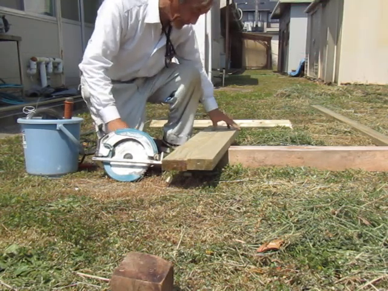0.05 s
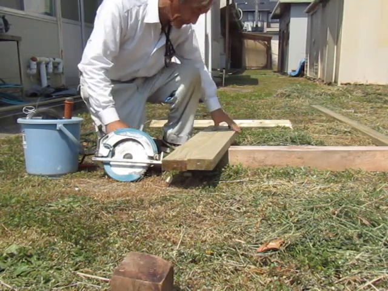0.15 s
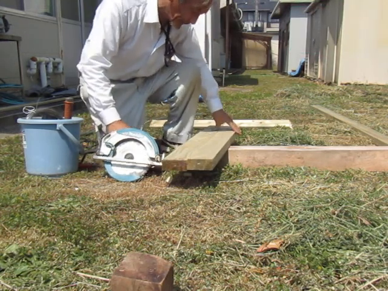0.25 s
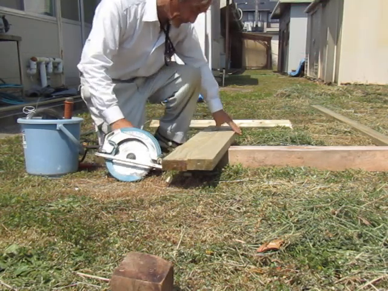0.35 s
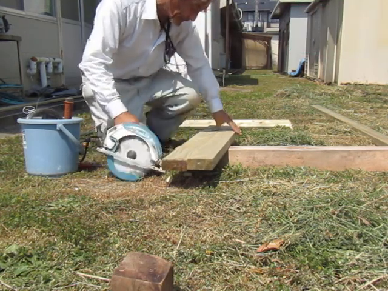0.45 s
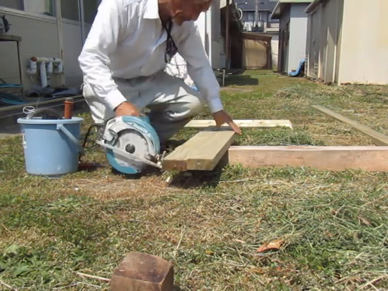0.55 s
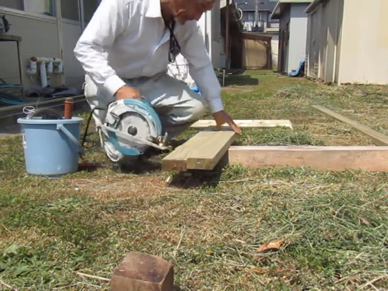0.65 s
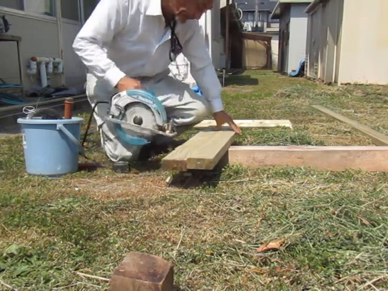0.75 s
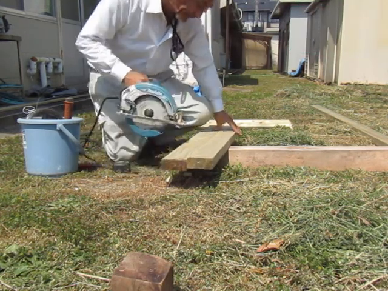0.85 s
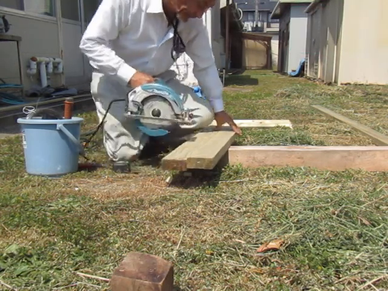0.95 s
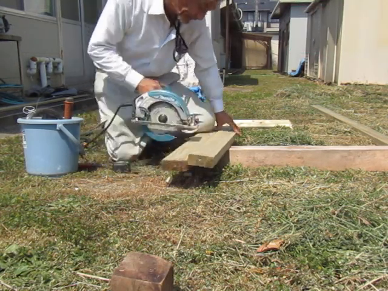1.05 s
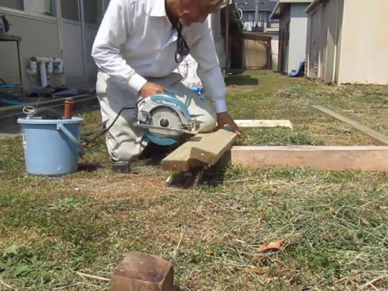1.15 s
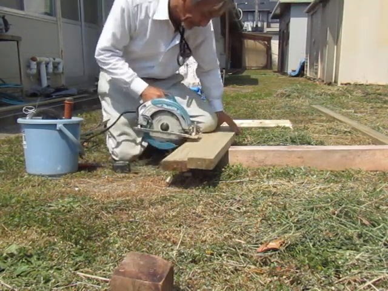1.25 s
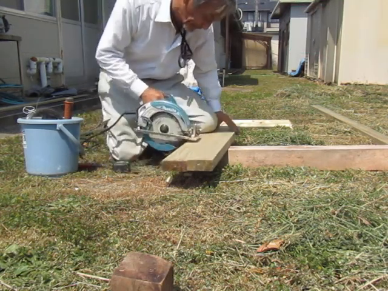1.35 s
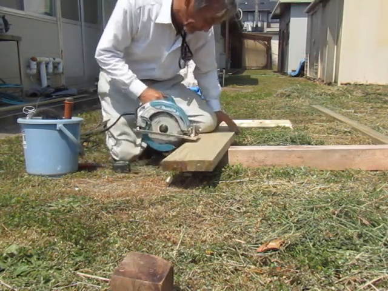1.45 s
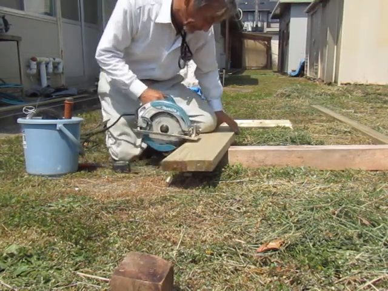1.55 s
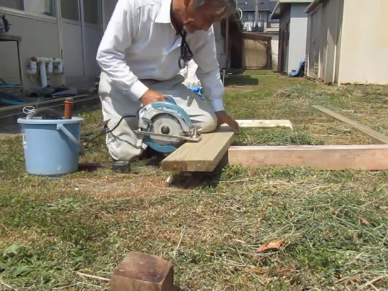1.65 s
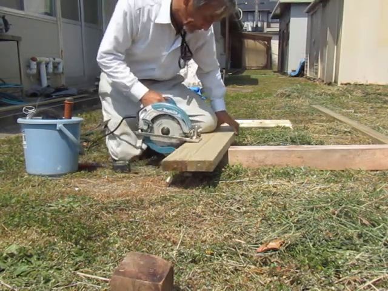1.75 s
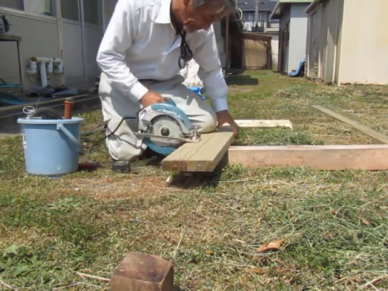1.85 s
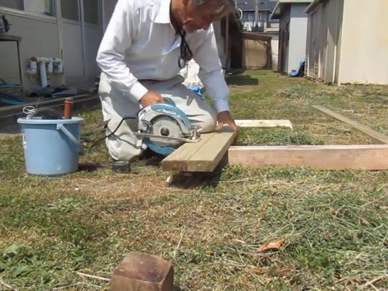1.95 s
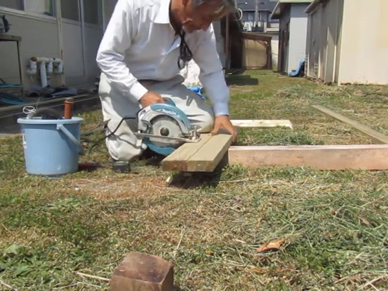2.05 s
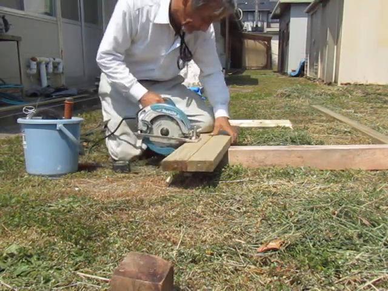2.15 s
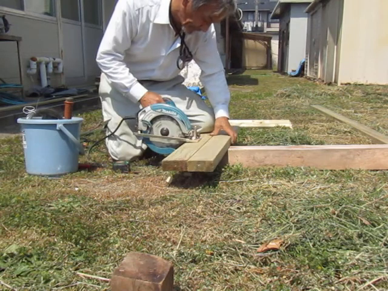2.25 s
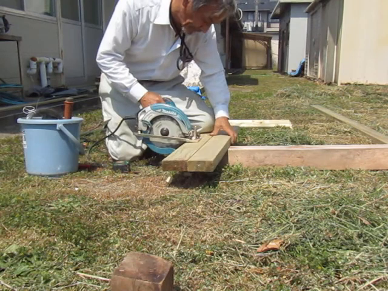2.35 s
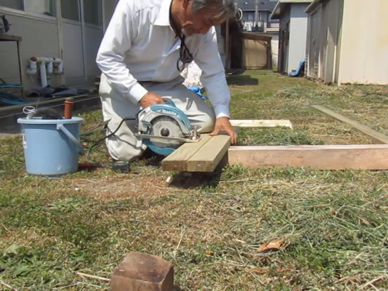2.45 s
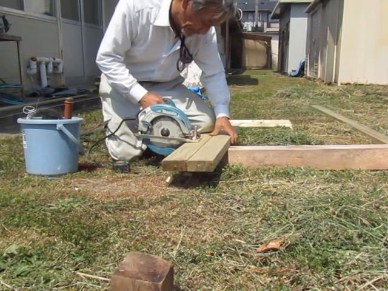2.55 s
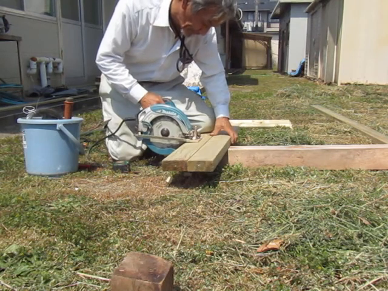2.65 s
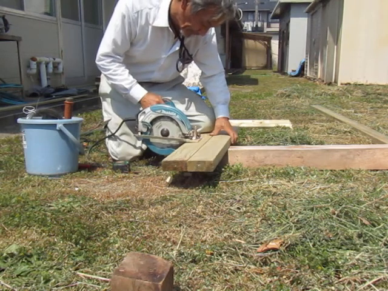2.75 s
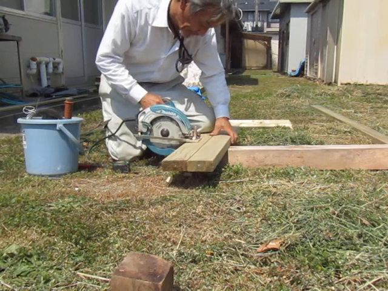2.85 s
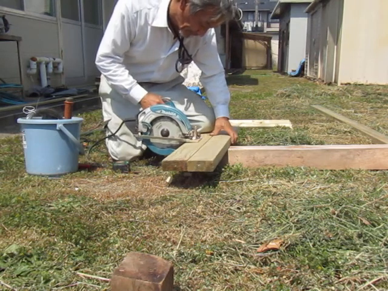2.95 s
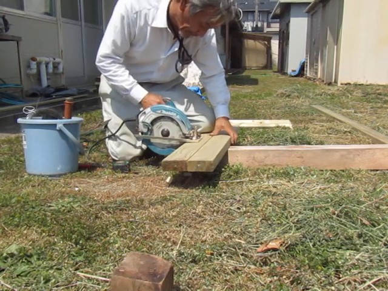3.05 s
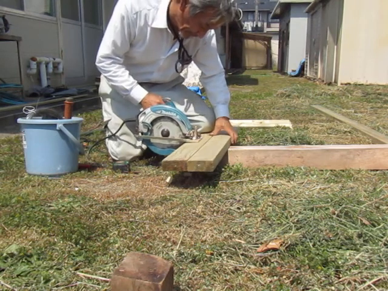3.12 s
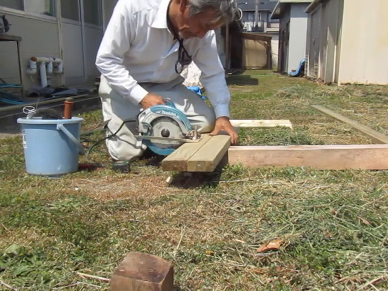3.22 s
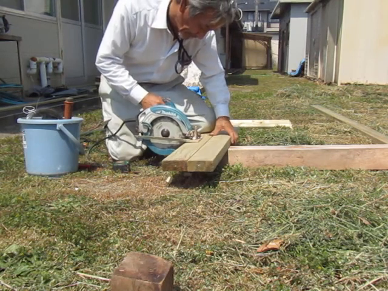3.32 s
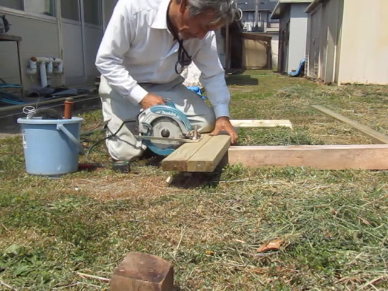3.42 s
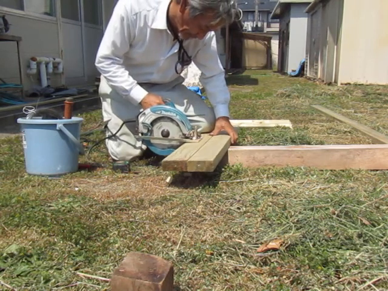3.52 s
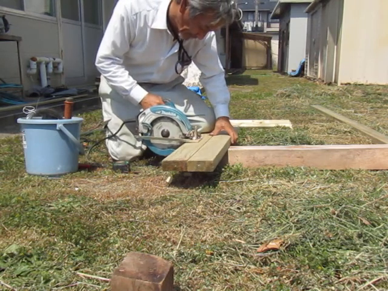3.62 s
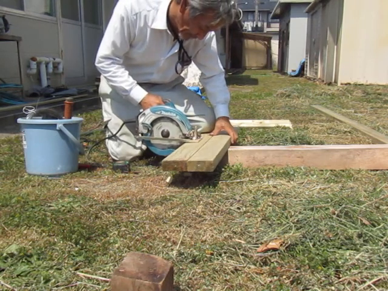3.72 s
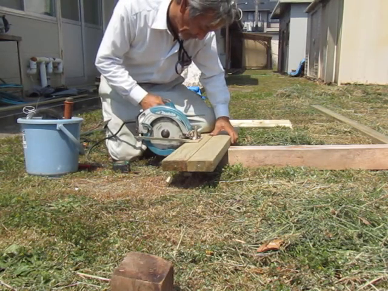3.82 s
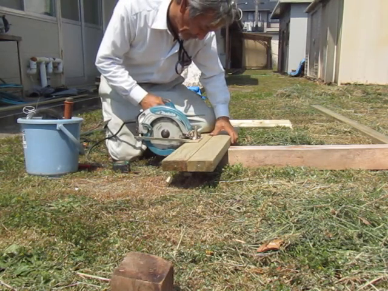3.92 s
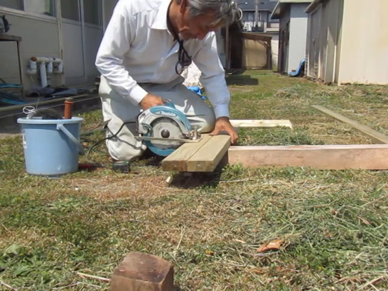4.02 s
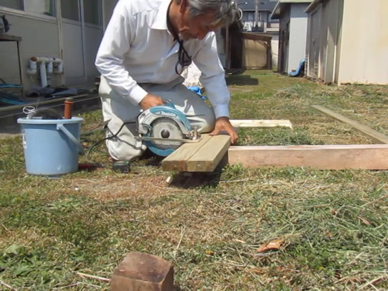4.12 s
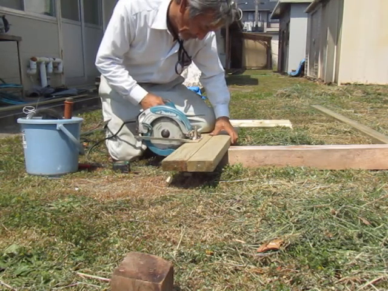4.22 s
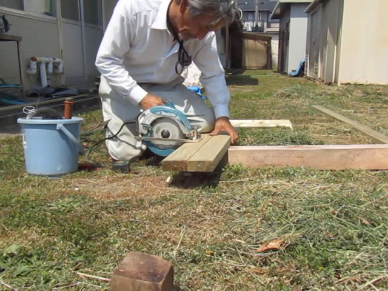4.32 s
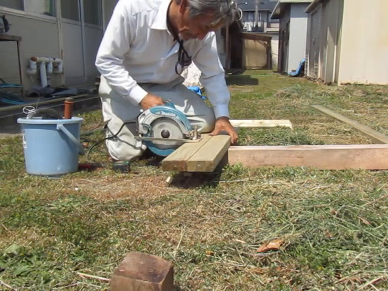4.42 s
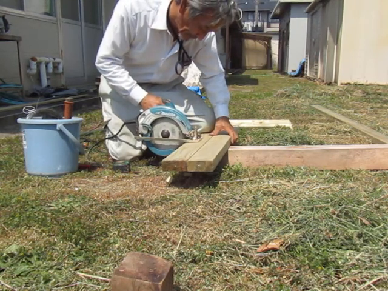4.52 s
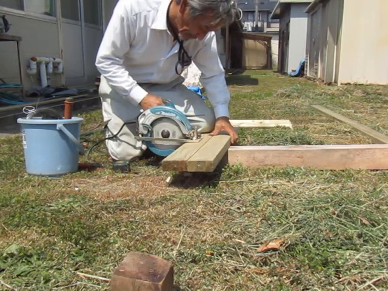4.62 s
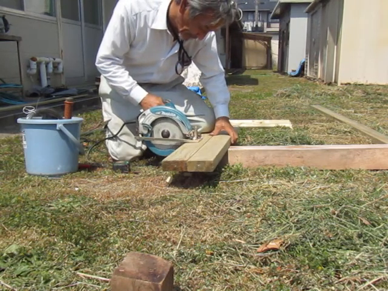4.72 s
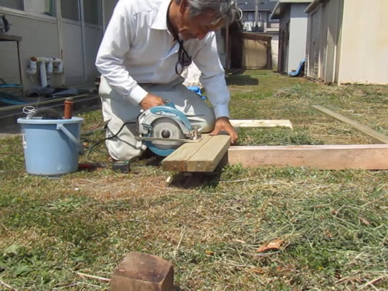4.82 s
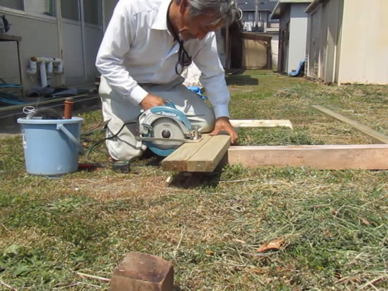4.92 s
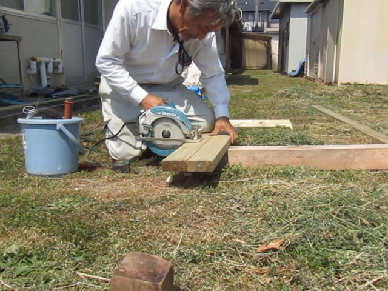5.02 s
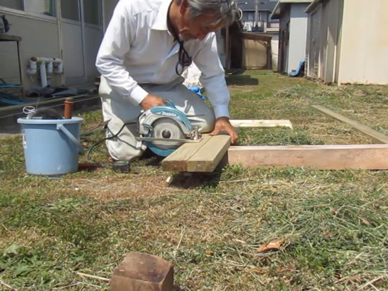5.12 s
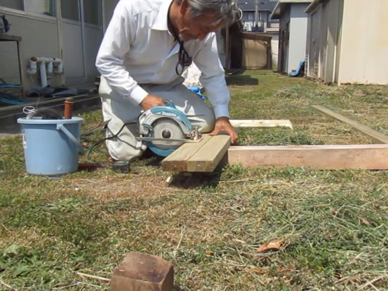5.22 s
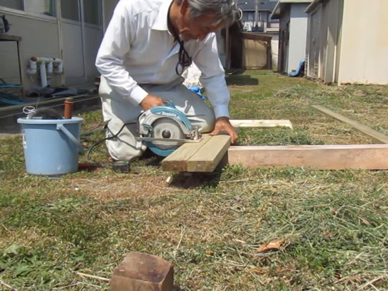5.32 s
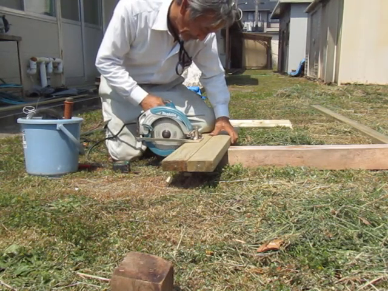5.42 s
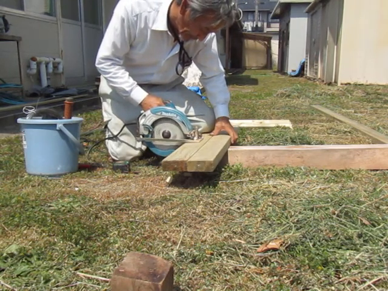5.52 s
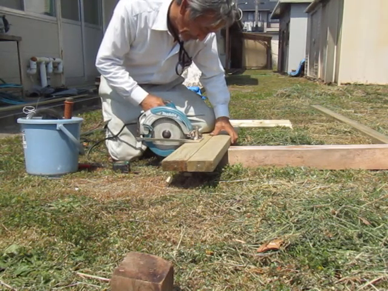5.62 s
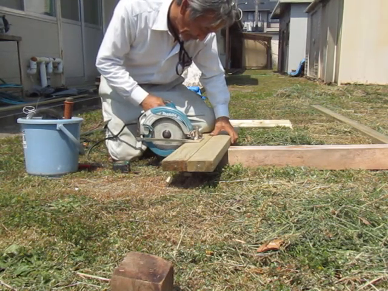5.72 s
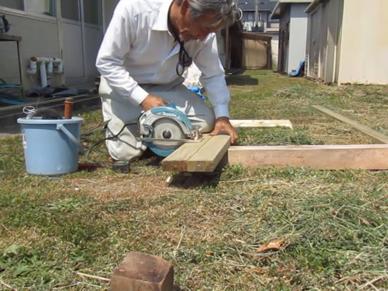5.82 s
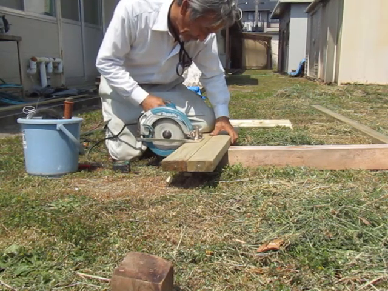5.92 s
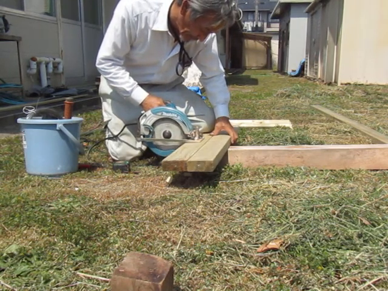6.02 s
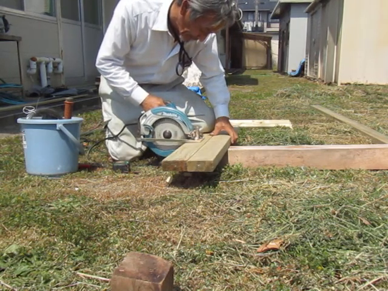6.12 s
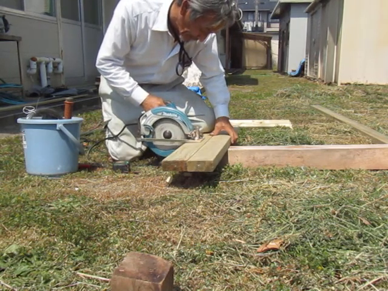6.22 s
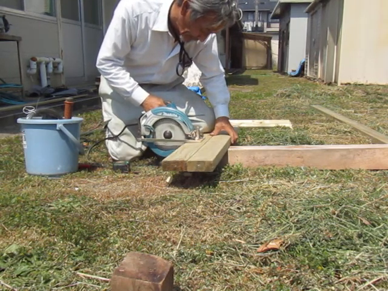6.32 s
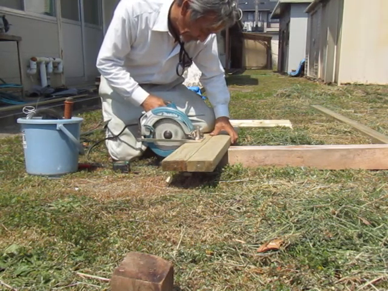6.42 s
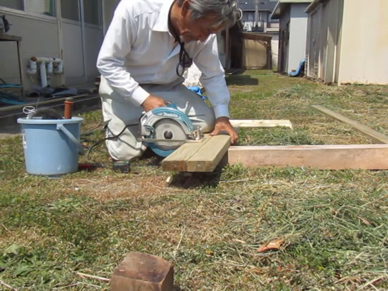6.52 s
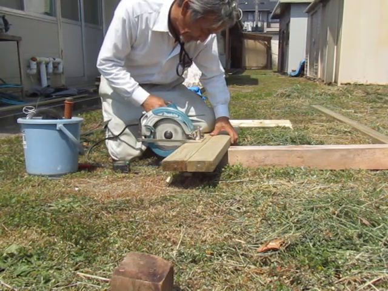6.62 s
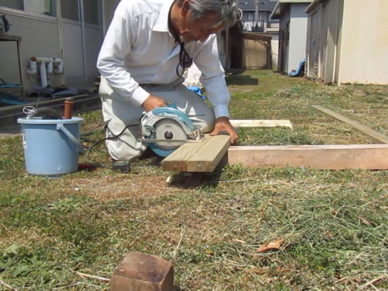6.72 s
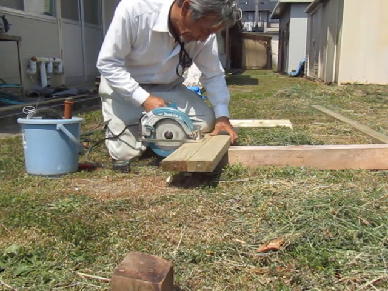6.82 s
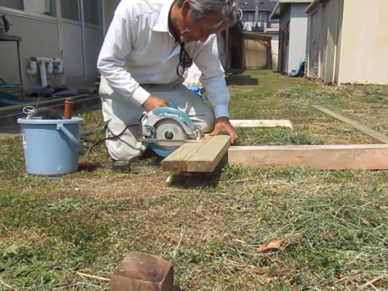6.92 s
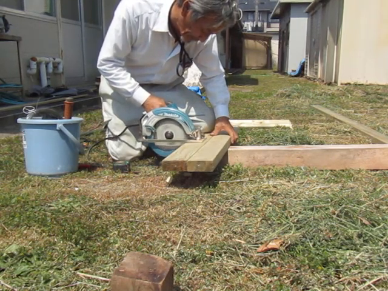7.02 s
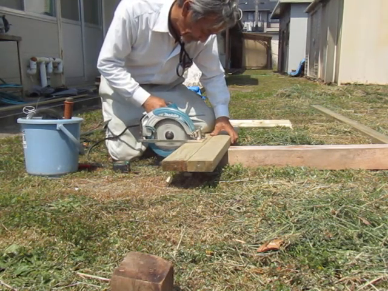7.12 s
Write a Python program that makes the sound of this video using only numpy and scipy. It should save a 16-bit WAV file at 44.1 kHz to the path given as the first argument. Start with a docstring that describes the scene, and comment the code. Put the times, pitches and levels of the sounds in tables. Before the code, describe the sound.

Quiet outdoor birdsong, one dull wooden knock, then an electric saw starts with a hard clack, revs up and rasps loudly through timber.

```python
"""A yard outdoors: a small bird sings over far traffic and a distant hum (swept sines, coloured noise).
A circular saw is set down on a thick board, which answers as a sum of decaying modes.
The motor kicks in with knocks and buzz; its gears whine up to speed, their phase tied to the blade's turns.
The blade bites: each turn repeats the same tooth strikes, which ring the steel and tear out fibres.
Rubbing in the kerf keeps the plate singing, and pinches draw squeals from single modes."""
import sys
import numpy as np
from scipy import signal
from scipy.fft import rfft, irfft, next_fast_len
from scipy.io import wavfile
from scipy.ndimage import uniform_filter1d, map_coordinates

SR = 44100
rng = np.random.default_rng(int(sys.argv[2]) if len(sys.argv) > 2 else 0)


def put_to_file(sound):
    """Save the sound as 16-bit audio at rate SR, in the file named by the first command-line argument."""
    columns = np.atleast_2d(sound).T  # one column per channel
    safe = np.clip(columns, -1, 1)
    whole_steps = np.round(safe * 32767)
    wavfile.write(sys.argv[1], SR, whole_steps.astype(np.int16))


N = 315756
T = np.arange(N) / SR

# Yard air: spectrum [f/Hz, relative density/dB]; droning bands in it [f/Hz, width/Hz, relative level/dB]
AIR_BED = [(18, -46), (30, -19), (71, -12), (99, -20.5), (195, -14.5), (320, -17), (394, -18), (497, -16.5),
           (859, -21.5), (1060, -17.5), (1270, -17.5), (2560, -28.5), (5440, -28), (8470, -34.5),
           (15000, -47.5)]
AIR_BANDS = [(392, 45, -14.5), (878, 77, -14), (1146, 48, -12.5)]
AIR_DB = -54.5
# Swells of the distant hum [t/s, length/s, level/dB]
HUM_SWELLS = [(0, 0.53, -51.5), (1.02, .5, -54.5), (1.77, 0.37, -55), (2.58, 0.55, -55.5), (3.86, .2, -53),
              (4.58, 0.5, -54.5)]
HUM_HZ, HUM_REST_DB = 68.3, -67.5
# Puffs of wind on the microphone [t/s, length/s, level/dB]; wind spectrum [f/Hz, relative level/dB]
GUSTS = [(3.67, 0.12, -44.5), (3.9, 0.046, -54), (6.9, 0.1, -51)]
WIND_BED = [(30, -6), (90, 1.5), (180, -5.5), (280, -16), (900, -55), (5000, -80)]
BREEZE_DB, BREEZE_DIES_S, BREEZE_FADE_S = -61, 5.7, 0.33
# Rustle of clothes and grass [t/s, length/s, level/dB]; its spectrum [f/Hz, relative level/dB]
RUSTLES = [(.27, 0.14, -56.5), (1.0, .2, -69), (2.0, .17, -66)]
RUSTLE_BED = [(100, -18), (450, -1), (1000, -7), (3000, -16), (9000, -24), (15000, -39)]
RUSTLE_REST_DB = -67

# Bird's falling slurs [t/s, length/s, first f/Hz, last f/Hz, warble/0-1, level/dB]
SLURS = [(0.072, 0.043, 6200, 4880, 0.2, -53), (0.464, 0.13, 6920, 3770, .2, -53),
         (0.887, 0.13, 6510, 2880, 0.22, -52), (1.195, .14, 5900, 3420, .4, -52.5),
         (1.46, .17, 6780, 4070, .35, -53), (1.716, 0.095, 4900, 3430, 0.22, -50.5),
         (1.889, 0.13, 5770, 3870, 0.37, -50), (2.05, .075, 4270, 3750, 0.37, -53),
         (2.243, .125, 6240, 3990, 0.1, -52), (2.557, 0.11, 4830, 3100, .2, -53),
         (3.453, 0.025, 5650, 3800, 0, -57), (3.716, .075, 6470, 4620, 0.16, -54),
         (3.964, .12, 5980, 3430, 0.33, -52)]
# Bird's short arched peeps [t/s, length/s, top f/Hz, level/dB]
PEEPS = [(.14, 0.036, 6630, -61), (0.188, .025, 6200, -56), (.3, 0.056, 4400, -55),
         (0.661, 0.04, 5910, -53.5), (0.722, .045, 7400, -62), (1.171, .04, 6240, -55),
         (1.7, 0.026, 6200, -54), (1.915, 0.03, 5450, -54), (2.522, 0.03, 6200, -57),
         (2.637, 0.058, 5500, -65), (2.81, .027, 5400, -64), (3.35, .095, 5330, -60),
         (3.432, 0.032, 5650, -56), (3.55, .055, 6300, -53.5), (3.658, 0.044, 4250, -52.5),
         (3.923, .035, 6380, -54)]
# Bird's harsh falling rasps [t/s, length/s, first f/Hz, level/dB]
RASPS = [(.335, 0.047, 4500, -50.5), (.904, 0.055, 4150, -50), (1.771, 0.063, 4150, -50.5),
         (2.474, 0.064, 4600, -51.5), (3.281, .072, 4440, -50.5), (4.045, 0.064, 4080, -53)]
SLUR_SAG, PEEP_ARCH, PEEP_TOP_SHARE, RASP_FALL = 1.3, 0.52, 0.6, 0.25
ECHO_S, ECHO_DB = 0.051, -18.5  # one reflection of the song from a wall across the yard

# Blows of the saw on the board [t/s, peak of the ringing/dB]
SET_DOWN = [(1.302, -15.5), (1.307, -34), (1.342, -37)]
# Modes of the board [f/Hz, relative level/dB, t60/s]
BOARD_MODES = [(164, -19.5, 0.051), (267, -9.5, 0.037), (400, -6.5, 0.031), (548, -2.5, 0.042),
               (657, -14, 0.036), (987, -11.5, 0.036), (1560, -32, 0.088), (1870, -29, 0.036)]
# Small handling ticks [t/s, peak of the ringing/dB]
TICKS = [(.137, -50.5)]
# Knocks in the gears at the start [t/s, peak of the ringing/dB]
GEAR_KNOCKS = [(4.132, -3.5), (4.157, -24), (4.166, -23), (4.182, -18), (4.191, -17), (4.199, -23),
               (4.275, -18)]
# Modes of the knocked saw [f/Hz, relative level/dB, t60/s]
SAW_MODES = [(270, -38, 0.089), (500, -13.5, 0.028), (785, -23, 0.029), (900, 1.5, 0.027),
             (1790, -16, 0.02), (2310, -15, 0.02), (2820, -16, 0.03), (4220, -16, 0.026),
             (7800, -18, 0.026), (8720, -27, .023)]

START_S = 4.132
GEAR_TEETH, PINION_TEETH, COMMUTATOR_BARS = 46, 9, 12
# The blade runs up in a quick surge and a slow creep, then the deepening cut drags on it
FREE_TURNS_PER_S, SURGE_SHARE, SURGE_S, CREEP_S = 88.16, 0.536, 0.1896, 0.665
DRAG_FROM_S, DRAG_TURNS_PER_S2 = 6.114, 4.05

# Starting buzz: relative level/dB of each harmonic of twice the mains rate, from the first up
BUZZ_HARMONICS_DB = [-8.5, -0.5, -19, -1, -17, 5.5, 7.5, 9]
# Shaking of the spinning parts [t/s, length/s, multiple of the turn rate, level/dB]
SHAKES = [(4.6, 0.92, 2, -54.5), (5.3, 0.85, 3, -53), (6.15, 0.87, 3, -46), (5.0, .65, 5, -38),
          (5.7, 1.31, 5, -41.5), (5.8, 1.33, 11, -35), (6.4, 0.57, 11, -33.5), (5.7, 1.5, 16, -41),
          (6.65, 0.098, 16, -29.5)]
SHAKE_ATTACK_S, SHAKE_RELEASE_S = 0.16, 0.075
# Commutator whine [multiple of the bar rate, level against the gear mesh/dB]
BAR_TONES = [(1, -9), (2, -14), (3, -20), (4, -20)]
# Resonances of the gear case [f/Hz, half-width/Hz, level/dB]
GEAR_CASE = [(1860, 190, -29), (2570, 370, -24), (3290, 130, -32)]
WHINE_BETWEEN_DB, WHINE_DAMPED_S, WHINE_FADE_DB_PER_S = -36, 5.2, 13
WHINE_FROM_S, WHINE_ONSET_S = 4.295, 0.022
# Running motor [t/s, level before tilting/dB, tilt step/dB: lows take -0.4 of it, highs 1.88]
MOTOR_COURSE = [(4.14, -27, -11), (4.24, -26.5, -2.5), (4.33, -22, -2), (4.44, -22, -1.5), (4.6, -21, 0.5),
                (4.8, -18, -2), (5.2, -17.5, -2), (5.6, -19, 0), (5.78, -28, 0.5), (6.3, -28, 3.5),
                (6.7, -29, 2), (7.16, -25, -3)]
# Broad colour of the motor [f/Hz, relative level/dB]
MOTOR_BED = [(60, -62), (130, -28), (300, -22.5), (650, -17), (1200, -21.5), (1450, -11), (1600, -20),
             (2200, -11), (2500, -19.5), (6000, -17.5), (8700, -15.5), (9300, -25), (12500, -26),
             (15500, -33)]
# Resonances of housing and guard [f/Hz, width/Hz, relative level/dB]
HOUSING = [(491, 95, -8), (921.4, 50.6, 2.5), (1823, 88, -8), (2688, 143, -11), (3240, 100, -13),
           (3750, 120, -18), (4100, 190, -12), (4600, 76, -10), (5050, 110, -14.5), (6020, 46, -11),
           (7470, 110, -9), (7850, 59, -6), (8470, 66, -8), (10130, 46, -14.5)]

# Plate modes that can sing, name: (f/Hz, waver/Hz, level/dB while the blade merely brushes the kerf)
SING_MODES = {"low": (2440, 7.5, -38), "middle": (4060, 6.03, -35), "upper": (4634, 16.74, -38.5),
              "top": (8184, 48, -38)}
# The kerf pinches the plate and one mode squeals [t/s, length/s, mode name, level/dB]
SQUEALS = [(5.612, 0.11, "low", -28), (5.656, 0.063, "top", -33), (5.73, 0.23, "middle", -27.5),
           (5.874, 0.054, "upper", -27), (5.974, .16, "upper", -30.5), (5.966, 0.027, "low", -36),
           (6.072, 0.067, "middle", -30), (6.73, .26, "upper", -30.5), (6.81, 0.07, "middle", -28.5),
           (6.834, 0.17, "low", -28), (7.06, .04, "top", -31)]
SING_FROM_S, SQUEAL_ATTACK_S, SQUEAL_RELEASE_S = 5.47, 0.028, 0.027
# Teeth in the wood [t/s, level before tilting/dB, tilt step/dB as for the motor]
CUT_COURSE = [(5.05, -53, 4), (5.18, -30, 0.5), (5.35, -33, -5), (5.47, -20.5, -5), (5.6, -21, -2.5),
              (5.72, -18, -1), (5.77, -21.5, -2), (5.9, -20.5, -1.4), (6.12, -21, -0.2), (6.32, -21.5, -2),
              (6.52, -18, -2.5), (6.76, -19, -2.5), (6.95, -23.5, -2), (7.16, -29, 4)]
# Broad colour of the cut [f/Hz, relative level/dB]
CUT_BED = [(100, -51), (400, -28.5), (1200, -26), (2000, -25.5), (2300, -14.5), (3500, -18.5), (7000, -18),
           (9500, -15), (12500, -13), (14000, -20.5), (15500, -32)]
# Resonances of the blade in the board [f/Hz, width/Hz, relative level/dB]
BLADE = [(454, 46, -13), (940, 71, -7), (1355, 35, -8.5), (1829, 49, -9), (2370, 120, -11.5),
         (2730, 82, -11), (2792, 51, -4), (2950, 12, -0.5), (3190, 58, -8), (3336, 71, -8.5),
         (3660, 66, -9), (3980, 28, -13.5), (4540, 300, -10.5), (5080, 250, -9), (5570, 43, -6.5),
         (5680, 16, -8), (5996, 160, -7.5), (6240, 33, -16), (6950, 24, -6.5), (7300, 33, -10),
         (8230, 170, -1.5), (8920, 160, -11.5), (9600, 60, -14), (10280, 120, -10.5), (10680, 93, -2.5),
         (11470, 250, -7.5), (12410, 85, -14)]
# Harder pushes, when the upper mids swell [t/s, length/s, added share/dB]
BITES = [(5.5, 0.19, -2), (5.89, 0.21, -4), (6.3, 0.15, -8), (6.75, 0.046, -3)]
BITE_REST_DB = -0.5
TOP_HZ = 15800


def undb(db):
    """Level definition: decibels to amplitude ratio."""
    return 10 ** (np.asarray(db) / 20)


def unit(x):
    """Normalisation by the root mean square, to rms 1."""
    return x / np.sqrt(np.mean(x ** 2) + 1e-20)


def curve(table):
    """Linear interpolation of the columns of timed rows, at every sample."""
    s, *columns = np.transpose(table)
    return [np.interp(T, s, c) for c in columns]


def walk(rate):
    """Smoothed chance: random steps, rate per second, averaged twice to a spread near 1."""
    k = int(SR / rate)
    steps = np.repeat(rng.standard_normal(N // k + 1), k)
    return 1.326 * uniform_filter1d(uniform_filter1d(steps, k), k)[:N]


def swell(s, length, attack_s, release_s):
    """Linear growth and exponential decay: rise from s, hold until the length is over, die away."""
    return np.clip((T - s) / attack_s, 0, 1) * np.exp(-np.maximum(T - s - length, 0) / release_s)


def swells(table, attack_s, release_s):
    """Superposition of the envelopes of rows [t/s, length/s, level/dB]."""
    return sum(undb(db) * swell(s, length, attack_s, release_s) for s, length, db in table)


def colour(x, bed=(), peaks=()):
    """Linear filtering: a broad spectrum and resonances add in power; the result has rms 1."""
    size = next_fast_len(N + 8192)
    f = np.arange(size // 2 + 1) * SR / size + 1e-3
    power = np.zeros(len(f))
    if len(bed):
        hz, db = np.transpose(bed)
        low_cut = f ** 2 / (f ** 2 + (hz[0] / 2) ** 2)
        power += undb(np.interp(np.log(f), np.log(hz), db)) ** 2 * low_cut
    for hz, width, db in peaks:
        off = ((f - hz * hz / f) / width) ** 2
        power += undb(db) ** 2 / (1 + off / 2) ** 2
    return unit(irfft(rfft(x, size) * np.sqrt(power), size)[:N])


def noise(bed=(), peaks=()):
    """Spectral shaping of white noise, to rms 1."""
    return colour(rng.standard_normal(N), bed, peaks)


def tilt(x, slope_db, pivot_hz=3000):
    """Spectral tilt: complementary low and high bands are weighted in opposite senses."""
    low = signal.sosfiltfilt(signal.butter(1, pivot_hz, fs=SR, output="sos"), x)
    return low * undb(-0.4 * slope_db) + (x - low) * undb(1.88 * slope_db)


def air():
    """Broadband radiation from far traffic: coloured noise with droning bands, its level drifting."""
    return noise(AIR_BED, AIR_BANDS) * undb(AIR_DB + 0.23 * walk(3.1))


def hum():
    """Frequency modulation: a distant low tone wavers in pitch and swells at times."""
    tone = unit(np.sin(2 * np.pi * np.cumsum(HUM_HZ + 1.51 * walk(14)) / SR))
    return tone * (undb(HUM_REST_DB) + swells(HUM_SWELLS, attack_s=0.083, release_s=0.21))


def whistle(hz=11795, level_db=-79):
    """Pure tone: a thin steady whistle of constant amplitude."""
    return undb(level_db) * np.sin(2 * np.pi * hz * T)


def wind():
    """Turbulent pressure on the microphone: low noise in a dying breeze and short gusts."""
    turbulence = noise(WIND_BED) * undb(2 * walk(35))
    breeze = undb(BREEZE_DB) * np.exp(-np.maximum(T - BREEZE_DIES_S, 0) / BREEZE_FADE_S)
    return turbulence * (breeze + swells(GUSTS, attack_s=0.046, release_s=0.044))


def rustle():
    """Friction noise of clothes and grass: irregular coloured noise under slow envelopes."""
    rubbing = noise(RUSTLE_BED) * undb(2 * walk(90))
    return rubbing * (undb(RUSTLE_REST_DB) + swells(RUSTLES, attack_s=0.057, release_s=0.1))


def yard():
    """Superposition of the background sources."""
    return air() + hum() + whistle() + wind() + rustle()


def walls(x, wet_db, t60):
    """Diffuse reflection from the sheds: convolution with exponentially decaying noise."""
    t = T[:SR // 2]
    tail = rng.standard_normal(len(t)) * undb(-60 * t / t60) * (t > 0.012)
    return x + undb(wet_db) * signal.fftconvolve(x, tail / np.linalg.norm(tail))[:N]


def bird(buzz_hz=140, buzz_depth=0.051, harshness=0.072, waver=0.0117,
         trill_hz=30, trill_depth=0.098, flicker_db=3.5):
    """Frequency modulation of a whistle: slurs fall fast and settle, peeps arch, rasps flutter."""
    out, drift, jitter = np.zeros(N), walk(110), walk(1100)

    def span(s, length):
        """Normalised time: the samples of a note and its progress from 0 to 1."""
        i = np.arange(int(s * SR), int((s + length) * SR))
        return i, np.linspace(0, 1, len(i))

    def add(i, u, hz, db):
        """Phase as the integral of frequency: sing one note along a pitch path."""
        envelope = np.abs(np.sin(np.pi * u)) ** 0.15 * undb(flicker_db * drift[i])
        phase = 2 * np.pi * np.cumsum(hz * (1 + waver * drift[i])) / SR
        out[i] += undb(db) * unit(envelope * np.sin(phase))

    for s, length, first_hz, last_hz, warble, db in SLURS:
        i, u = span(s, length)
        hz = first_hz + (last_hz - first_hz) * np.expm1(-SLUR_SAG * u) / np.expm1(-SLUR_SAG)
        trill = trill_depth * np.sin(2 * np.pi * trill_hz * (T[i] - s))
        add(i, u, hz * (1 + warble * (trill + harshness * jitter[i])), db)
    for s, length, top_hz, db in PEEPS:
        i, u = span(s, length)
        add(i, u, top_hz * (1 - PEEP_ARCH * (u - PEEP_TOP_SHARE) ** 2), db)
    for s, length, first_hz, db in RASPS:
        i, u = span(s, length)
        flutter = buzz_depth * np.sin(2 * np.pi * buzz_hz * T[i]) + harshness * jitter[i]
        add(i, u, first_hz * (1 - RASP_FALL * u) * (1 + flutter), db)
    return out


def echo(song):
    """Specular reflection: the wall returns one delayed, weaker copy."""
    return song + undb(ECHO_DB) * np.interp(T - ECHO_S, T, song)


def strikes(table, modes, crack_db, crack_s, crack_hz, push_s):
    """Modal response to impact: each blow rings decaying modes and gives a short noisy crack."""
    t = T[:SR // 4]
    out = np.zeros(N + len(t))
    crack_filter = signal.butter(1, crack_hz, fs=SR, output="sos")
    for s, db in table:
        ring = np.zeros(len(t))
        for hz, mode_db, t60 in modes:
            struck_hz = hz * (1 + 0.018 * rng.standard_normal())  # no two blows quite alike
            ring += undb(mode_db) * np.sin(2 * np.pi * struck_hz * t) * undb(-60 * t / t60)
        ring *= 1 - np.exp(-t / push_s)  # contact takes time to set the body moving
        crack = unit(signal.sosfilt(crack_filter, rng.standard_normal(len(t)))) * np.exp(-t / crack_s)
        i = int(s * SR)
        out[i:i + len(t)] += undb(db) * (ring / abs(ring).max() + undb(crack_db) * crack)
    return out[:N]


def blade_speed():
    """Rotational inertia: turns/s approach free speed exponentially, less the drag of the wood."""
    age = np.maximum(T - START_S, 0)
    lag = SURGE_SHARE * np.exp(-age / SURGE_S) + (1 - SURGE_SHARE) * np.exp(-age / CREEP_S)
    return FREE_TURNS_PER_S * (1 - lag) - DRAG_TURNS_PER_S2 * np.maximum(T - DRAG_FROM_S, 0)


def inrush(mains_hz=60, buzz_db=-39, fade_s=0.53):
    """Magnetic attraction at twice the mains rate: starting current buzzes the iron, then decays."""
    buzz = np.zeros(N)
    for k, db in enumerate(BUZZ_HARMONICS_DB, 1):
        buzz += undb(db) * np.sin(2 * np.pi * 2 * k * mains_hz * T + rng.uniform(0, 2 * np.pi))
    return buzz * undb(buzz_db) * np.exp(-np.maximum(T - START_S, 0) / fade_s)


def drone(turns, sway=0.46, flutter_db=2.3):
    """Forced vibration: spinning blade and armature shake the saw at multiples of the turn rate."""
    out = np.zeros(N)
    for order in sorted({round(row[2]) for row in SHAKES}):
        spells = [(s, length, db) for s, length, k, db in SHAKES if round(k) == order]
        tone = unit(np.sin(2 * np.pi * order * turns + sway * walk(35))) * undb(flutter_db * walk(15))
        out += tone * swells(spells, SHAKE_ATTACK_S, SHAKE_RELEASE_S)
    return out


def gears(turns, speed, backlash=1.03, brush_play=1.8, flutter_db=2):
    """Resonance sweep: mesh and commutator tones, phase smeared by play (rad), cross the case modes."""
    mesh = 2 * np.pi * turns * GEAR_TEETH + backlash * walk(220)
    bar_turns = turns * GEAR_TEETH * COMMUTATOR_BARS / PINION_TEETH
    bars = 2 * np.pi * bar_turns + brush_play * walk(260)  # bouncing brushes
    tone = np.sin(mesh) + sum(undb(db) * np.sin(round(k) * bars) for k, db in BAR_TONES)
    tone *= 1 + 0.5 * np.sin(2 * np.pi * turns)
    mesh_hz = speed * GEAR_TEETH
    case = sum(undb(db) / (1 + ((mesh_hz - hz) / width) ** 2) for hz, width, db in GEAR_CASE)
    onset = np.exp(np.minimum(T - WHINE_FROM_S, 0) / WHINE_ONSET_S)
    damping = undb(-WHINE_FADE_DB_PER_S * np.maximum(T - WHINE_DAMPED_S, 0))  # load quiets the whine
    gain = np.hypot(case, undb(WHINE_BETWEEN_DB)) * onset * damping
    return unit(tone * undb(flutter_db * walk(60))) * gain


def motor(turns, rattle_db=1.0, flutter_db=0.89):
    """Random excitation of resonances: fan air, brushes and loose gear teeth shake the housing."""
    db, slope_db = curve(MOTOR_COURSE)
    rotor = turns * GEAR_TEETH / PINION_TEETH
    shake = rng.standard_normal(N) * undb(rattle_db * walk(500) + flutter_db * walk(40))
    shake *= 1 + 0.19 * np.cos(2 * np.pi * rotor)
    return tilt(colour(shake, MOTOR_BED, HOUSING), slope_db) * undb(db)


def singing(turns, wander_db=1.0, flutter_db=2.0, throb=0.23):
    """Friction-driven oscillation: kerf sides rub four plate modes once a turn; a pinch makes one squeal."""
    rubbing = np.clip((T - SING_FROM_S) / 0.046, 0, 1)
    out = np.zeros(N)
    for name, (hz, waver_hz, db) in SING_MODES.items():
        pinches = [(s, length, peak_db) for s, length, mode, peak_db in SQUEALS if mode == name]
        gain = rubbing * undb(db + wander_db * walk(14))
        gain += swells(pinches, SQUEAL_ATTACK_S, SQUEAL_RELEASE_S)
        flutter = undb(flutter_db * walk(70)) * (1 + throb * np.cos(2 * np.pi * turns + walk(12)))
        tone = np.sin(2 * np.pi * np.cumsum(hz + waver_hz * walk(90)) / SR)
        out += gain * unit(tone * flutter)
    return out


def one_turn(turns, size=4096, count=200, uneven_db=3):
    """Periodicity in angle: one uneven scrape of all the teeth, repeated on every turn."""
    phases = np.exp(2j * np.pi * rng.random(count))
    shape = irfft(np.r_[0, phases * undb(uneven_db * rng.standard_normal(count))], size)
    return unit(np.interp(turns % 1, np.arange(size) / size, shape, period=1))


def shifting(x, patchy_db, band_hz, change_s):
    """Time-varying filtering: each spectral region of the rasp swells and fades irregularly, by chance."""
    f, t, spectrum = signal.stft(x, SR, nperseg=512)
    grid = np.meshgrid(f / band_hz, t / change_s, indexing="ij")
    field = map_coordinates(rng.standard_normal(size=(128, 128)), grid, order=3, mode="wrap")
    depth_db = patchy_db * f[:, None] / (f[:, None] + band_hz * 2)  # lows stay steadier
    return unit(signal.istft(spectrum * undb(depth_db * field), SR)[1][:N])


def cut(turns, tearing_db=-6, grain_db=1.42, feed_db=0.6, bite_low_hz=4700, bite_high_hz=6800):
    """Periodic and random forcing of blade modes: tooth strikes drift with the grain, torn fibres hiss."""
    db, slope_db = curve(CUT_COURSE)
    angle = 0.91 * walk(8)  # turns slowly between two tooth patterns
    teeth = np.cos(angle) * one_turn(turns) + np.sin(angle) * one_turn(turns)
    fibres = unit(rng.standard_normal(N) * undb(2 * walk(900)))
    force = (teeth + undb(tearing_db) * fibres) * undb(grain_db * walk(70))
    rasp = shifting(colour(force, CUT_BED, BLADE), patchy_db=2.9, band_hz=240, change_s=0.1)
    bite_band = signal.butter(2, [bite_low_hz, bite_high_hz], "band", fs=SR, output="sos")
    tips = signal.sosfiltfilt(bite_band, rasp)  # the tooth tips' share
    rasp = rasp + tips * (undb(BITE_REST_DB) + swells(BITES, attack_s=0.023, release_s=0.05) - 1)
    return tilt(rasp, slope_db + 0.1 * walk(7.4)) * undb(db + feed_db * walk(16))


def scene():
    """Superposition at one point: the yard, the bird, the board and the saw."""
    background = yard()
    song = walls(echo(bird()), wet_db=-7.5, t60=0.58)
    board = strikes(SET_DOWN, BOARD_MODES, crack_db=-28, crack_s=0.0088, crack_hz=900, push_s=0.0059)
    board = walls(board, wet_db=-19, t60=0.23)
    ticks = strikes(TICKS, SAW_MODES, crack_db=6, crack_s=0.0015, crack_hz=5000, push_s=0.001)
    knocks = strikes(GEAR_KNOCKS, SAW_MODES, crack_db=-21.5, crack_s=0.011, crack_hz=5760, push_s=0.0036)
    speed = blade_speed()
    turns = np.cumsum(speed) / SR
    switched_on = np.clip((T - START_S) / 0.0025, 0, 1)
    running = inrush() + drone(turns) + gears(turns, speed) + motor(turns)
    saw = switched_on * (running + singing(turns) + cut(turns))
    mono = background + song + board + ticks + knocks + saw
    return np.array([mono, mono])


def record(dry):
    """Band limitation: a steep elliptic low-pass cuts the top."""
    return signal.sosfilt(signal.ellip(10, 0.2, 80, TOP_HZ, fs=SR, output="sos"), dry)


dry = scene()
out = record(dry)
put_to_file(out)
```